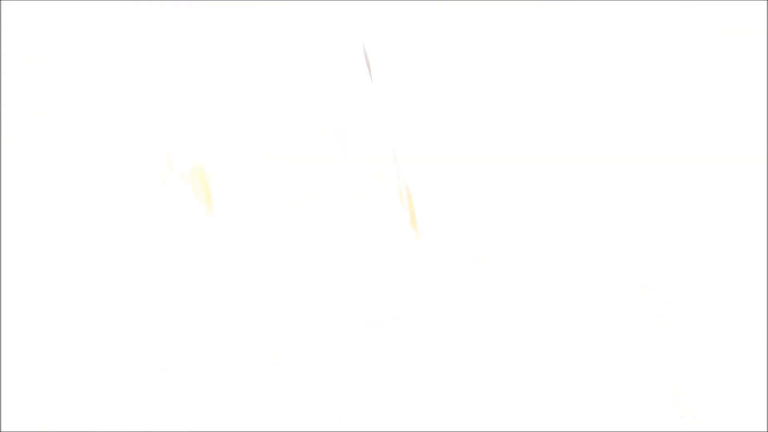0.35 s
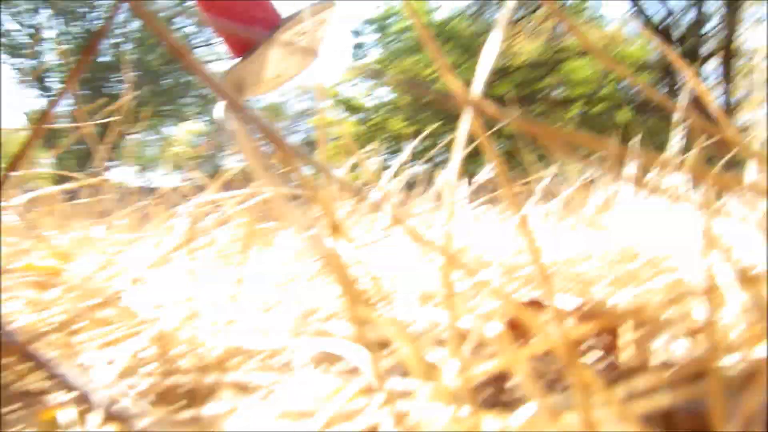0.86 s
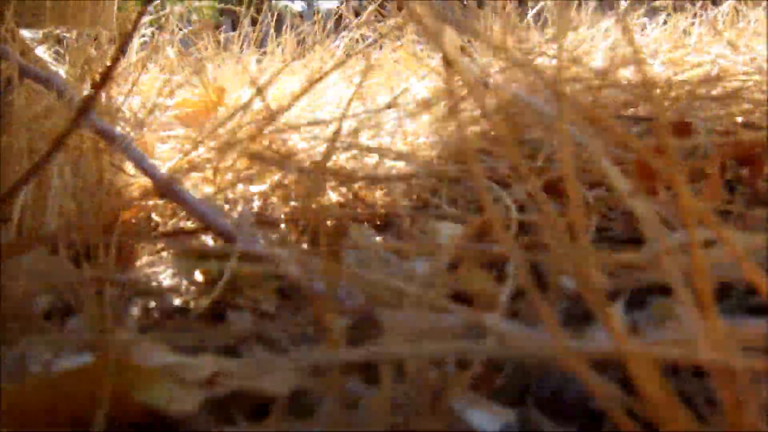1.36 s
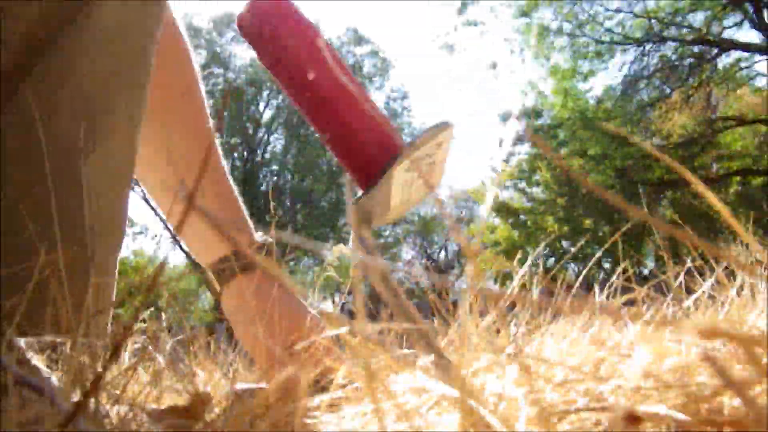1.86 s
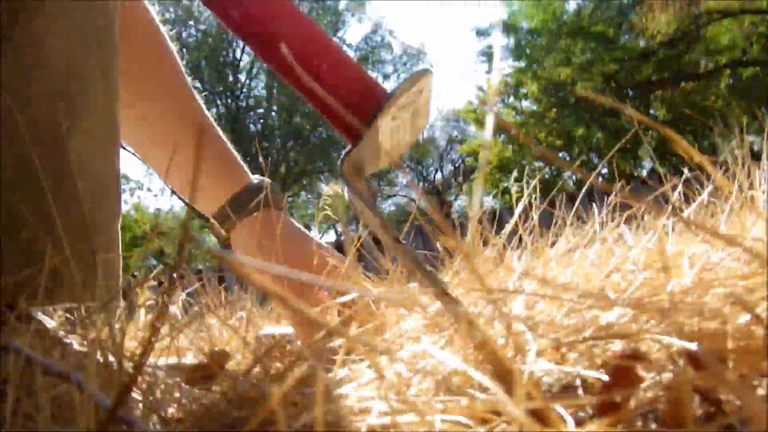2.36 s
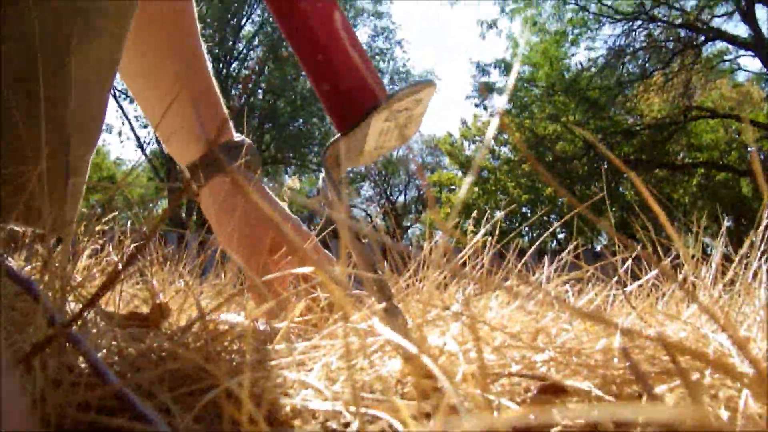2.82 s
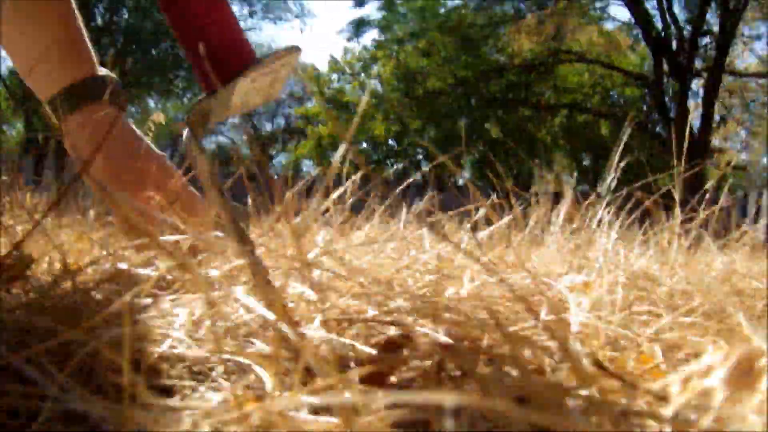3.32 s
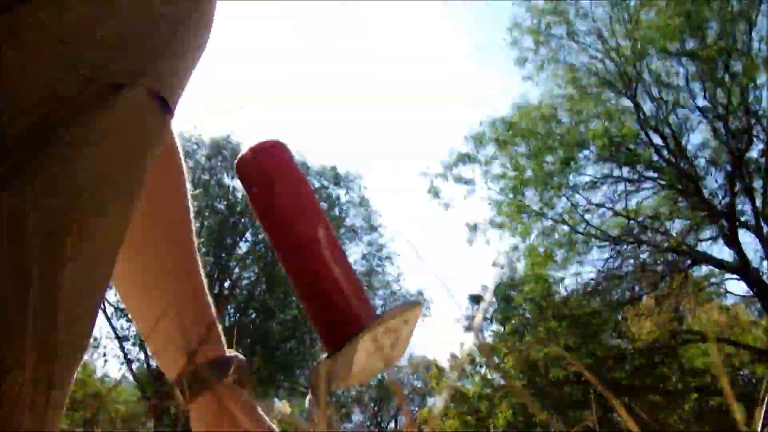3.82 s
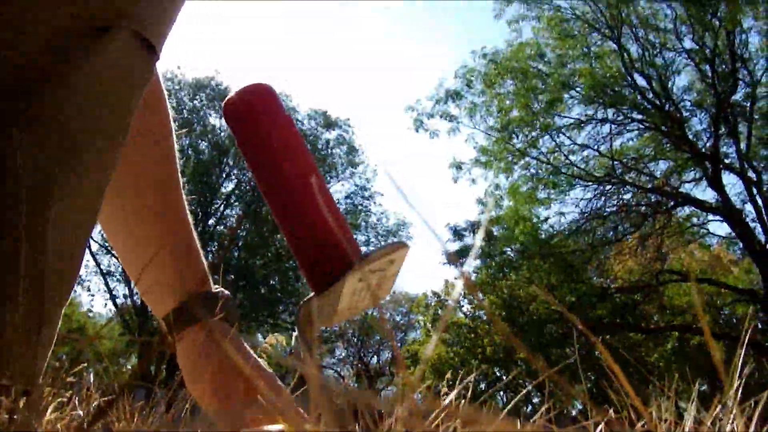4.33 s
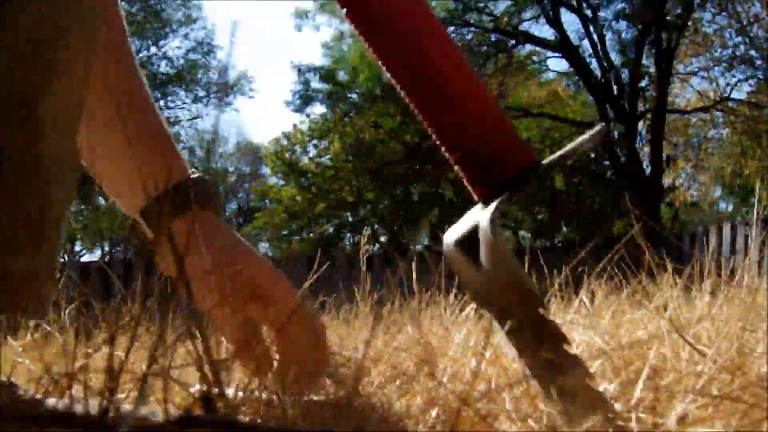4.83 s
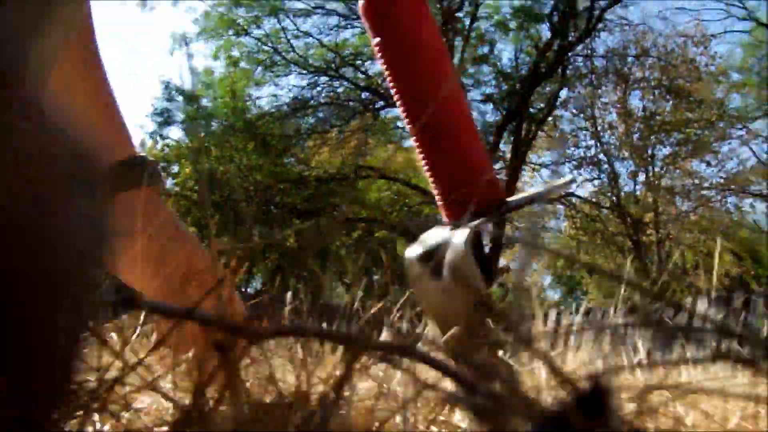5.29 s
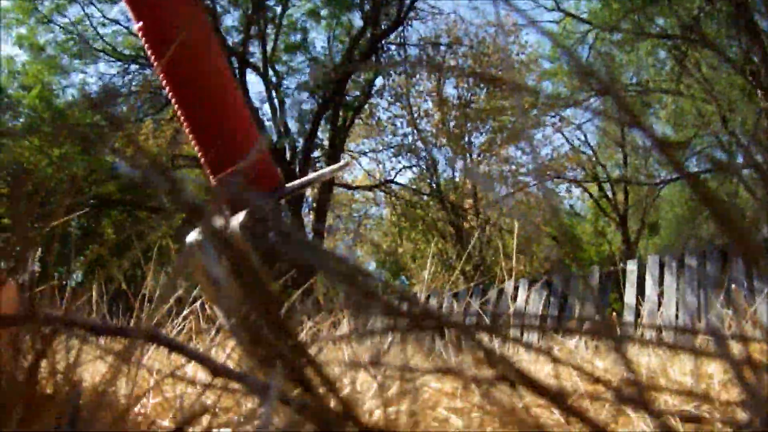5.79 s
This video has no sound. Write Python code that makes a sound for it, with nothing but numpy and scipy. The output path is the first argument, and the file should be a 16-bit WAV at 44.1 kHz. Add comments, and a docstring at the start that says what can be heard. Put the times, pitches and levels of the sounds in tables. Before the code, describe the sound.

Outdoors, a small handheld camera lies among brittle dry grass, its mono microphone almost touching the stalks. From 0 to 0.9 seconds, dense rustling and scraping swell in quick overlapping strokes, peppered with sharp snaps and finger rubs. It thins after 1 second; a heavy dull bump lands at 1.4, a bright snap at 1.47, and a hard scrape with knocks at 1.7. Around 1.9 to 2.1 it is nearly quiet, then a snap and moderate rustling follow at 2.2 to 2.5, with a tiny creak at 2.3. After another lull, a strong burst at 3.1 to 3.4 brings loud snaps, bumps and short casing creaks. A deep thump comes at 3.6, then sparser rustle. The strongest crunching stroke swells at 4.5, with very bright snaps at 4.57. Rubbing, bumps and crackles continue from 4.8, with a sharp snap at 5.57, over low grip rumble and faint hush.

```python
"""Dry grass rustles, scrapes and snaps close against a small camera being handled: fingers rub it,
its shell creaks and it bumps the ground, over a slow rumble of the grip and a faint outdoor hush.
Rustle, scrape and rub are noisy slips that swell with each stroke; snaps are short noise bursts.
These, the rumble and the hush are coloured by the resonances of the casing; creaks ring the shell,
and bumps are pushes on a diaphragm that swings back."""
import sys
import numpy as np
from scipy import signal
from scipy.io import wavfile
from scipy.ndimage import uniform_filter1d

SR = 44100
rng = np.random.default_rng(int(sys.argv[2]) if len(sys.argv) > 2 else 0)


def boost(x):
    """Linear amplitude factor 10**(x/20) for a level x in decibels (scalar or array-like)."""
    u = np.asarray(x, float) / 20
    return 10 ** u


def bounce(signal):
    """Save signal as a 16-bit WAV file at the path given by the first command-line argument."""
    frames = np.transpose(np.atleast_2d(signal))
    limited = np.clip(frames, -1, 1)
    pcm = np.round(limited * 32767).astype(np.int16)
    wavfile.write(sys.argv[1], SR, pcm)


N = 261072


def strokes():
    """Powers of the strokes through the grass add up; louder ones weigh more in how coarse it sounds."""
    # strokes: (peak time t/s, rustle level/dB, rise/ms, fall/ms, coarse scrape over the rustle/dB)
    stroke_rows = [(0.026, -32.5, 21, 135, -8), (0.087, -19.5, 42, 24, -5.5), (.115, -44, 36, 120, 10),
                   (.19, -33, 88, 110, -2), (.27, -28, 213, 360, -3), (.472, -30, 180, 154, -10),
                   (.543, -31.5, 79, 22, -4), (.577, -33, 21, 71, -7), (.635, -21.5, 13, 15, -25),
                   (.699, -31, 140, 190, -10.5), (.818, -22.5, 237, 163, -2), (.991, -40, 130, 190, -2.5),
                   (1.126, -46.5, 42, 160, -6.5), (1.262, -38.5, 94, 58, -0.5), (1.342, -44.5, 180, 28, -4),
                   (1.4, -36, 24, 160, 5.5), (1.449, -31, 82, 120, -2), (1.57, -38, 600, 440, -3.5),
                   (1.685, -22.5, 54, 92, 1.5), (1.774, -38, 170, 6, -16), (1.834, -37.5, 54, 47, -1),
                   (1.875, -53, 40, 25, -4), (1.94, -52, 32, 230, -1), (2.02, -47.5, 81, 200, -7),
                   (2.118, -47.5, 43, 18, -3), (2.19, -35, 73, 42, 2.5), (2.275, -32.5, 155, 360, -7),
                   (2.405, -30.5, 140, 510, -4), (2.532, -36, 210, 17, 17), (2.592, -35.5, 38, 38, -1),
                   (2.72, -44, 330, 470, -1.5), (2.903, -46.5, 180, 140, 0.5), (3.02, -34.5, 170, 140, 1),
                   (3.104, -22.5, 38, 15, -0.5), (3.134, -27, 48, 105, -3), (3.207, -27.5, 140, 81, -8),
                   (3.332, -26, 48, 87, -3), (3.372, -28.5, 93, 14, -0.5), (3.433, -40.5, 150, 100, -4.5),
                   (3.53, -36, 94, 410, -5), (3.688, -32, 270, 94, 2), (3.735, -43, 76, 22, -7),
                   (3.818, -49, 300, 240, -3), (3.992, -42.5, 24, 140, -1), (4.028, -33.5, 105, 116, -4.5),
                   (4.137, -38.5, 180, 55, -3), (4.225, -51.5, 90, 67, -2), (4.346, -35, 156, 51, -5.5),
                   (4.462, -25, 22, 130, 0), (4.512, -19, 76, 79, -5), (4.567, -24.5, 180, 14, 2),
                   (4.689, -35, 330, 240, -6.5), (4.826, -28.5, 57, 32, -3.5), (4.885, -34.5, 80, 190, -5),
                   (4.99, -33.5, 380, 100, -4.5), (5.043, -36.5, 60, 43, -1.5),
                   (5.135, -36.5, 320, 330, -3), (5.205, -32.5, 40, 47, -2.5), (5.25, -26, 88, 104, -1.5),
                   (5.303, -25, 30, 36, -6), (5.391, -37, 71, 140, 11.5), (5.469, -25.5, 150, 190, -4),
                   (5.575, -29, 190, 14, -0.5), (5.66, -42, 210, 150, -4.5), (5.796, -43, 130, 51, -7),
                   (5.9, -32.5, 63, 260, -3)]
    rest_db = -98
    power = swells(stroke_rows)
    total = power.sum(0)
    scrape_db = np.transpose(stroke_rows)[4] @ power / total
    straw_db = 10 * np.log10(total + boost(2 * rest_db))
    return per_sample(straw_db), per_sample(scrape_db)


def handling(straw_db, scrape_db):
    """Clumped slips, fine and coarse, are coloured into straw, sheen, scrape and finger rub."""
    # what each contact gives off: (f/Hz, level/dB)
    straw = [(1800, -30), (2700, -9), (3200, 0), (5500, -2), (7200, -5), (8000, -18), (10000, -40)]
    sheen = [(6000, -31.5), (7500, 9), (9000, 11.5), (11000, 5.5), (13000, 1.5), (15500, 1)]
    scrape = [(500, -30), (800, -8), (1000, 0), (2400, 0), (3000, -12), (4500, -36)]
    rub = [(100, -5), (220, 0.5), (600, -0.5), (900, -14.5), (2000, -53.5)]
    # thin blades flick past the port, bright and brief: (peak time t/s, level/dB, rise/ms, fall/ms)
    flicks = [(.092, -31.5, 62, 18), (.818, -33.5, 140, 66), (1.47, -51, 40, 44), (2.42, -43, 60, 60),
              (2.697, -41.5, 49, 35), (2.85, -53, 67, 44), (3.374, -33.5, 50, 17), (3.433, -43, 30, 40),
              (4.26, -51, 40, 69), (4.565, -34, 90, 55), (4.69, -41, 180, 80), (4.8, -43, 120, 43)]
    # fingers slide over the casing: (peak time t/s, level/dB, rise/ms, fall/ms)
    rubs = [(0.023, -36, 20, 40), (.1, -34.5, 60, 20), (.33, -37.5, 300, 210), (.57, -37, 140, 25),
            (.64, -37, 23, 80), (.751, -36, 90, 410), (.87, -41, 110, 80), (0.996, -33.5, 88, 30),
            (1.41, -40, 60, 60), (1.69, -28.5, 37, 43), (2.31, -38, 120, 90), (3.13, -38, 40, 36),
            (3.205, -31, 68, 28), (3.6, -40, 53, 80), (4.455, -36, 30, 54), (4.51, -35, 80, 88),
            (4.83, -35, 22, 82), (5.04, -59, 48, 43)]
    # port resonance as the grip shifts: (t/s, f/Hz)
    port = [(0.0, 4460), (1.37, 4570), (1.48, 4230), (1.53, 3480), (1.8, 4580), (3.15, 4700), (3.18, 3600),
            (3.3, 4730), (4.71, 4930), (4.93, 4000), (5.01, 4260), (5.21, 3500), (5.59, 4800), (5.92, 4400)]

    sheen_db = straw_db - 12 + 0.7 * lumps(ms=20)
    # fingers rub more evenly than straw rustles, so the rub follows the rustle only in part
    rub_db = straw_db - 20.5 + 0.74 * scrape_db - 0.28 * straw_db + 1.5 * lumps(ms=40)
    fine, coarse = slipping(straw_db)
    mixed = 0.69 * evened(fine) + 0.61 * evened(coarse)
    layers = [(fine, straw, straw_db),
              (fine, sheen, with_events(sheen_db, flicks)),
              (mixed, scrape, straw_db + scrape_db),
              (coarse, rub, with_events(rub_db, rubs))]
    out = np.zeros(N)
    for slips, points, level_db in layers:
        out += coloured(slips, colour(points)) * boost(level_db)
    return patchy(out, patch_db=1.5, port_hz=along(port))


def slipping(straw_db):
    """Stalks let go in bunches, so fine and coarse contact share one clumpy envelope."""
    # a hard stroke touches so many stalks that it evens out
    unevenness = np.clip((-22.5 - straw_db) / 18, .4, 1.2)
    clumps = boost(unevenness * (1.9 * lumps(ms=3.5) + .9 * lumps(ms=10)))
    bits = evened(crunch(per_s=2200, spread_db=2.5, cycles=2.82))
    grit = evened(crunch(per_s=1800, spread_db=3.0, cycles=8.7))  # harder grains ring longer
    fine = clumps * (contact(per_s=3500, spread_db=3.0, hiss=0.95) + 0.33 * bits)
    coarse_clumps = clumps * boost(1.44 * lumps(ms=4.7))
    coarse = coarse_clumps * (contact(per_s=980, spread_db=1.5, hiss=1.0) + 0.52 * grit)
    return fine, coarse


def contact(per_s, spread_db, hiss):
    """Tiny slips of random size and sign over a sliding hiss."""
    slips = random_hits(per_s, spread_db) * rng.standard_normal(N)
    return evened(evened(slips) + hiss * rng.standard_normal(N))


def crunch(per_s, spread_db, cycles, count=36):
    """Bits of straw and grit, each a few cycles at its own pitch with a soft start."""
    out = np.zeros(N)
    size = random_hits(per_s, spread_db)
    kind = rng.integers(0, count, N)
    for k, hz in enumerate(np.geomspace(850, 8000, count)):
        turns = np.arange(0, 4 * cycles, hz / SR)
        envelope = (turns / cycles) ** 2 * np.exp(-3 * turns / cycles)
        grain = envelope * np.sin(2 * np.pi * turns)
        out += signal.oaconvolve(size * (kind == k), grain / np.linalg.norm(grain))[:N]
    return out


def patchy(x, patch_db, port_hz):
    """Different stalks touch from moment to moment, so patches of the spectrum swell and fade."""
    port_width_hz, port_peak_db = 600, 6
    hz, t, z = signal.stft(x, SR, nperseg=256, noverlap=192)
    noise = rng.standard_normal(z.T.shape)
    patches = evened(uniform_filter1d(uniform_filter1d(noise, 12, axis=0), 5, axis=1)).T
    centre = port_hz[np.minimum((t * SR).astype(int), N - 1)]
    port_db = port_peak_db / (1 + (2 * (hz[:, None] - centre) / port_width_hz) ** 2)
    return signal.istft(z * boost(patch_db * patches + port_db), nperseg=256, noverlap=192)[1][:N]


def snaps(rows):
    """A noise burst swells as a stalk splinters, cuts off as it gives way, and peaks at its pitch."""
    length_ms, length_spread = 1.2, 0.41  # typical scale of a snap, and its spread as a log ratio
    out, ms = np.zeros(N), np.arange(-300, 200) * 1000 / SR
    draws = rng.standard_normal((len(rows), len(ms) + 1))
    for (s, peak_db, hz, sharp_db), (spread, *noise) in zip(rows, draws):
        length = length_ms * np.exp(length_spread * spread)
        swell = np.where(ms < 0, np.exp(ms / (.35 * length)), np.exp(-ms / (.2 * length)))
        stalk = [(300, -26), (0.88 * hz, -9), (hz, -1.5), (1.3 * hz, -8), (min(1.7 * hz, 8600), -14),
                 (9000, -21 + sharp_db), (16000, -30.0 + 0.78 * sharp_db)]
        sound = np.convolve(noise * swell, colour(sorted(stalk), size=1024))
        start = s - np.argmax(abs(sound)) / SR
        add(out, start, boost(peak_db) * sound / abs(sound).max())
    return out


def small_snaps(straw_db):
    """Thin stalks give way at random moments, their peaks standing above the rustle around them."""
    count, over_rustle_db, spread_db, middle_hz = 100, 13.5, 2, 4480
    at, loud, pitch, sharp = rng.random((count, 4)).T
    s = .02 + at * (N / SR - .04)
    peak_db = straw_db[(s * SR).astype(int)] + over_rustle_db + spread_db * (2 * loud - 1)
    return list(zip(s, peak_db, middle_hz * (.8 + .4 * pitch), 20 * sharp - 8))


def echoes(cracks):
    """Snaps come back from the ground and the knee nearby."""
    # reflections: (delay/ms, level/dB)
    reflections = [(2.9, -15), (4.6, -38), (7.5, -33.5)]
    return sum(boost(db) * np.roll(cracks, round(ms * SR / 1000)) for ms, db in reflections)


def creaks():
    """The casing creaks under the grip: slightly uneven slips ring the low modes of the shell."""
    # creaks: (start t/s, length of the slipping/ms, peak level/dB, slip rate at start/Hz, at end/Hz)
    creak_rows = [(2.299, 23.4, -22, 253, 380), (3.179, 12, -18, 540, 520), (3.195, 11, -11.5, 430, 590),
                  (3.2126, 3, -8, 530, 940)]
    # modes of the shell: (f/Hz, width/Hz, level/dB)
    shell = [(306, 39, 7), (553, 120, 9.5), (960, 160, 18.5)]
    out, t = np.zeros(N), np.arange(1500) / SR
    ring = sum(boost(db) * np.exp(-np.pi * w * t) * np.sin(2 * np.pi * hz * t) for hz, w, db in shell)
    strengths = rng.uniform(.5, 1, (len(creak_rows), 2000))
    for (s, ms, peak_db, start_hz, end_hz), strength in zip(creak_rows, strengths):
        turns = np.cumsum(np.linspace(start_hz, end_hz, round(ms * SR / 1000))) / SR
        slips = np.diff(np.floor(turns), prepend=-1) * strength[:len(turns)]  # one per whole turn
        sound = np.convolve(slips, ring)
        add(out, s, boost(peak_db) * sound / abs(sound).max())
    return out


def bumps():
    """A push that fades, its rebound, and the slower sway of the hand; long pushes start softly."""
    # bumps that push the diaphragm: (start t/s, peak level/dB, push length scale/ms, rebound f/Hz)
    bump_rows = [(0.0751, -22, 1.1, 109), (0.096, -33, 7.3, 40), (0.324, -34, 8, 45),
                 (0.6802, -22, 3.5, 114), (0.69, -28, 6.3, 45.7), (0.9321, -25.5, 1.5, 84.5),
                 (1.393, -20.5, 1.6, 92), (1.4165, -9.5, 3, 79), (1.4742, -24.5, 10, 56),
                 (1.525, -35.5, 12, 40), (1.615, -34, 13, 40), (1.6718, -17.5, 1.1, 116),
                 (1.69, -20, 2.2, 63.6), (1.7087, -24.5, 11, 41), (1.7248, -26, 4.8, 40),
                 (2.197, -20, 5.7, 72), (2.9792, -31.5, 4.3, 53.7), (3.1016, -14, 5.5, 69.5),
                 (3.1791, -19, 3.5, 107), (3.189, -28, 4.3, 45), (3.202, -38, 7.3, 60),
                 (3.2178, -26, 4.7, 82), (3.346, -22.5, 7.6, 47), (3.571, -23, 4, 65),
                 (3.601, -9.5, 2.3, 103), (3.72, -34.5, 8, 50), (3.966, -37, 6.4, 55),
                 (4.4511, -20.5, 3.7, 45.4), (4.471, -31, 5.4, 55), (4.5066, -28, 3.3, 110),
                 (4.5632, -28.5, 7.2, 112), (4.825, -26.5, 2.3, 71), (4.9893, -22, 8.7, 61),
                 (5.025, -18, 8.7, 59.4), (5.0463, -19, 1.4, 95), (5.0537, -18.5, 3.8, 39.3),
                 (5.193, -24, 3, 110), (5.5555, -21, 1.3, 109), (5.853, -26, 1.5, 99)]
    out, ms = np.zeros(N), np.arange(6000) * 1000 / SR
    for s, peak_db, length, hz in bump_rows:
        rise = 1 - (1 + ms / (0.17 * length)) * np.exp(-ms / (0.085 * length))
        push = rise * np.clip(1 - (ms / (1.49 * length)) ** 2.7, 0, 1)
        sway = rebound(push, hz=32.7, q=1.34)
        sound = rebound(push, hz, q=2.5) + 1.2 * sway
        add(out, s, -boost(peak_db) * sound / sound.max())
    return out


def rebound(push, hz, q):
    """A vented diaphragm lets steady pressure leak away and swings back."""
    w = 2 * np.pi * hz
    return signal.lfilter(*signal.bilinear([1, 0, 0], [1, w / q, w ** 2], SR), push)


def grip_rumble(straw_db):
    """Slow pressure of the hand on the diaphragm; it presses harder around a stroke."""
    # pressure of the hand before the strokes add to it: (t/s, rumble level/dB)
    grip = [(0.0, -51), (0.76, -44), (1.05, -72), (1.34, -55), (1.57, -43.5), (1.88, -55), (2.16, -54),
            (2.32, -41), (2.42, -42.5), (2.64, -56.5), (2.98, -59), (3.17, -44), (3.25, -40), (3.36, -49.5),
            (3.86, -52.5), (4.8, -53.5), (5.08, -42.5), (5.43, -48), (5.62, -49), (5.92, -77)]
    # spectrum of the rumble: (f/Hz, level/dB)
    rumble = [(10, -4), (25, 5), (45, -1), (90, -4.5), (160, -9), (400, -42)]
    per_rustle_db, smooth_ms = 0.48, 110
    effort_db = uniform_filter1d(straw_db - straw_db.mean(), int(smooth_ms * SR / 1000))
    level_db = along(grip) + per_rustle_db * effort_db
    pressure = boost(3.4 * lumps(ms=9.2)) * rng.standard_normal(N)
    return coloured(pressure, colour(rumble, size=16384)) * boost(level_db)


def air():
    """Faint steady hush of the distant outdoors: coloured noise."""
    # spectrum of the hush: (f/Hz, relative level per Hz/dB)
    hush = [(60, -28), (150, -13), (400, -17), (1000, 2), (3000, -14), (8000, -10), (15000, -27)]
    return boost(-59) * coloured(rng.standard_normal(N), colour(hush))


def dips():
    """The level of the whole sound dips briefly and smoothly."""
    # dips: (middle t/s, length/ms, depth/dB)
    dip_rows = [(1.903, 21, -8.5), (5.037, 5.3, -22), (5.359, 16, -11)]
    ms = np.arange(N) * 1000 / SR
    return boost(sum(db * np.exp(-(2 * (ms - 1000 * s) / length) ** 4) for s, length, db in dip_rows))


def colour(points, size=4096):
    """A spectrum seen through the casing, as an impulse response."""
    # resonances of casing and microphone port, the last a notch: (f/Hz, width/Hz, level/dB)
    casing = [(334.7, 72, 10.5), (920, 240, 5), (1420, 530, 3.5), (2110, 180, 2.5), (3360, 1600, 7),
              (4650, 1520, 7), (7050, 2700, 9.5), (7520, 110, -12)]
    hz = np.fft.rfftfreq(size, 1 / SR)
    f, db = np.transpose(points)
    casing_db = sum(d / (1 + (2 * (hz - c) / w) ** 2) for c, w, d in casing)
    return causal(np.interp(np.log(hz + 1), np.log(f + 1), db) + casing_db)


def causal(db):
    """Minimum-phase impulse response: it starts at once and has the given levels on the rfft bins."""
    log_gain = np.log(boost(np.maximum(np.r_[db, db[-2:0:-1]], -100)))
    return np.fft.ifft(np.exp(np.conj(signal.hilbert(log_gain)))).real[:len(db) - 1]


def coloured(x, response):
    """Filters a sound and scales it to rms 1."""
    return evened(signal.oaconvolve(x, response)[:N])


def evened(x):
    """Scales to rms 1."""
    return x / np.sqrt(np.mean(x ** 2) + 1e-20)


def lumps(ms):
    """Random wobble of rms 1 that holds for about ms."""
    size = max(int(ms * SR / 1000), 2)
    return evened(uniform_filter1d(uniform_filter1d(rng.standard_normal(N), size), size))


def random_hits(per_s, spread_db):
    """Single-sample hits at random moments, a few of them much larger."""
    return (rng.random(N) < per_s / SR) * boost(spread_db * np.minimum(rng.exponential(1, N), 4))


def swells(rows):
    """Power of each row every 32 samples: it swells to its peak and dies away."""
    edge_db, bend = 27, 1.11  # edge_db down one rise before and one fall after the peak
    s, db, rise, fall = np.transpose(rows)[:4, :, None]
    ms = np.arange(N // 32 + 2) * 32000 / SR - 1000 * s
    distance = np.where(ms < 0, -ms / rise, ms / fall)
    return boost(2 * (db - edge_db * distance ** bend)) + 1e-30


def per_sample(curve):
    """Stretches a curve from every 32 samples to every sample."""
    return np.interp(np.arange(N) / 32, np.arange(len(curve)), curve)


def with_events(db, rows):
    """Adds the power of some events to a level."""
    return 10 * np.log10(boost(2 * db) + per_sample(swells(rows).sum(0)))


def along(rows):
    """A curve of (t/s, value) rows at every sample."""
    s, value = np.transpose(rows)
    return np.interp(np.arange(N) / SR, s, value)


def add(mix, s, sound):
    """Mixes a sound in at a time in seconds."""
    part = mix[round(s * SR):][:len(sound)]
    part += sound[:len(part)]


def scene():
    """Strokes through the grass drive the handling, the small snaps and part of the rumble."""
    # stalks that snap: (peak time t/s, peak level/dB, pitch of the stalk f/Hz, sharpness of the treble/dB)
    snap_rows = [(.0186, -19.5, 3000, 2), (.0696, -6, 3300, 10.5), (.1209, -16, 1620, -12),
                 (.1465, -17.5, 3930, -20), (.2244, -13, 4030, 9), (.2753, -9, 4170, 0),
                 (.3093, -17, 4400, -16), (.3297, -7, 2390, 5), (.437, -10, 4580, -11),
                 (.4557, -17, 6430, -8), (.474, -22, 4610, -1), (.4927, -8, 3380, -1.5),
                 (.5085, -14.5, 3330, 6), (.5488, -14, 4100, -2), (.5624, -8, 4220, 4),
                 (.5671, -5.5, 4020, -5), (.578, -7, 1380, 0), (.5852, -8.5, 4260, -14),
                 (.6365, -16, 4480, 14), (.6563, -7.5, 7100, -3), (.6698, -6.5, 4270, 1),
                 (.7053, -7.5, 4300, 7), (.789, -6, 4400, -1), (.839, -8, 4270, -5),
                 (.8832, -13.5, 4480, -13), (.9039, -17, 4240, 16), (.9827, -19, 4400, -14),
                 (1.0426, -19, 4300, 5), (1.0937, -29, 4260, 15), (1.1197, -27.5, 4520, -9),
                 (1.2305, -22.5, 4200, 9), (1.2835, -26, 6980, 1), (1.335, -30, 1430, -1),
                 (1.378, -22, 2110, -9), (1.3923, -16.5, 2436, -4), (1.4695, -4.5, 5940, 14),
                 (1.5826, -19, 3400, 7), (1.6434, -20, 4690, -15), (1.6699, -9, 3330, -1),
                 (1.6927, -4.5, 1420, -5), (1.821, -20.5, 1500, -8), (1.8604, -18.5, 1480, -1),
                 (1.9228, -19, 1450, -4), (1.9405, -23.5, 4730, 1), (2.0127, -35, 4690, 17),
                 (2.0587, -28, 1510, -3), (2.1528, -24, 5020, 2), (2.1957, -4, 2020, -5.5),
                 (2.355, -20, 4650, 20), (2.4295, -12, 4900, 14), (2.5328, -5, 6400, -11),
                 (2.576, -25, 4630, 2), (2.6722, -29, 5650, -7.5), (2.8312, -22, 1290, 2),
                 (2.9446, -16.5, 4330, 0), (2.9637, -21, 4840, -6), (3.1012, -1, 3760, 2),
                 (3.1325, -10, 4500, -7), (3.168, -8, 3560, 11), (3.191, -5, 3400, -21),
                 (3.2396, -23.5, 3470, 6), (3.31, -15, 3600, 10), (3.3386, -4.5, 1320, 1),
                 (3.6023, -14, 1340, -3), (3.681, -13, 7000, -2), (3.7286, -19.5, 3320, -6),
                 (3.7999, -17.5, 4100, -17), (3.8334, -27.5, 5600, -3), (4.109, -17, 6900, 10),
                 (4.11, -17.5, 1420, -6), (4.134, -21, 4200, 7), (4.3473, -28, 4650, 9),
                 (4.4642, -12, 4720, -13), (4.5661, -5, 5330, -1), (4.569, -2.5, 7200, 22),
                 (4.5834, -13.5, 2280, -6), (4.623, -17, 4930, 13), (4.8261, -4.5, 3830, 8.5),
                 (4.9305, -15, 3670, 10), (5.154, -22, 4950, -11), (5.2046, -18, 3750, -10),
                 (5.2418, -10.5, 1200, -23), (5.2607, -9.5, 1440, -15), (5.2866, -13, 6740, 0),
                 (5.381, -16, 3830, -8), (5.4082, -6, 3820, 13), (5.4666, -19, 4000, -12),
                 (5.4741, -9.5, 5000, -15), (5.5176, -8.5, 1360, -6), (5.5565, -17, 4150, 9),
                 (5.574, -0.5, 5470, 13), (5.5876, -15.5, 6730, 7), (5.6091, -16, 3370, 6),
                 (5.6647, -17.5, 4830, 1), (5.802, -22, 6740, 4), (5.852, -20, 4000, 2),
                 (5.9169, -9, 4520, -15)]
    straw_db, scrape_db = strokes()
    cracks = snaps(snap_rows) + snaps(small_snaps(straw_db))
    grass = handling(straw_db, scrape_db) + cracks + echoes(cracks)
    body = creaks() + bumps() + grip_rumble(straw_db)
    return (grass + body + air())[None] * dips()


def band_limit(x):
    """A steep low-pass at the top of the band."""
    return signal.sosfilt(signal.butter(12, 16510, fs=SR, output="sos"), x)


def record(dry):
    """The microphone flattens the highest peaks, then its top falls away steeply."""
    ceiling, top_hz = .58, 14460
    flat = dry / (1 + abs(dry / ceiling) ** 6) ** (1 / 6)
    top = signal.butter(6, top_hz, fs=SR, output="sos")
    return band_limit(signal.sosfilt(top, flat))


dry = scene()
out = record(dry)
bounce(out)
```